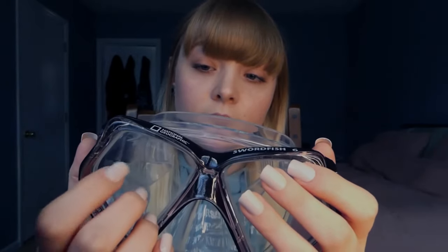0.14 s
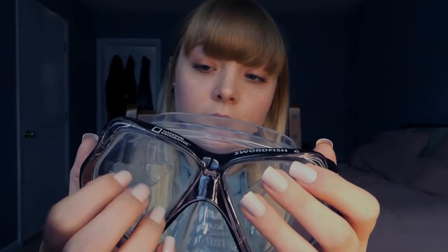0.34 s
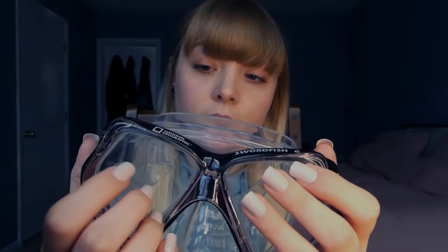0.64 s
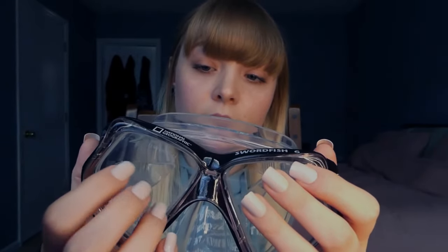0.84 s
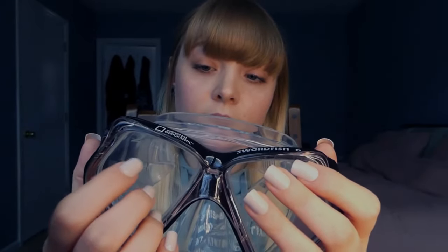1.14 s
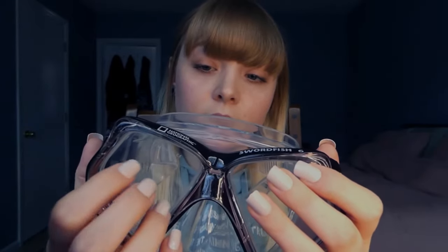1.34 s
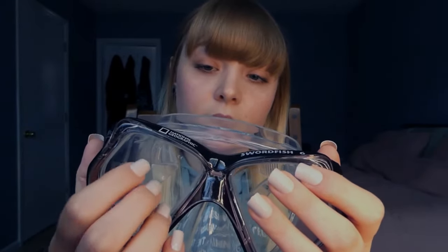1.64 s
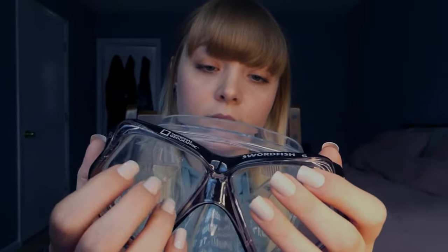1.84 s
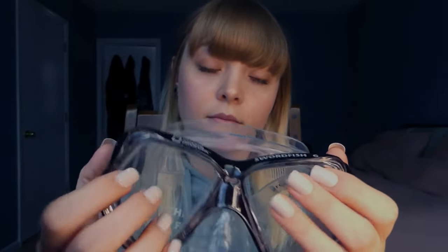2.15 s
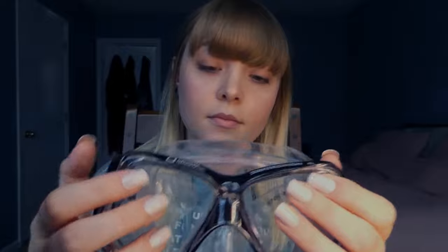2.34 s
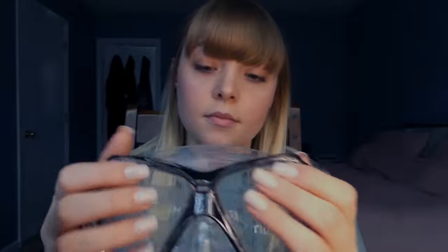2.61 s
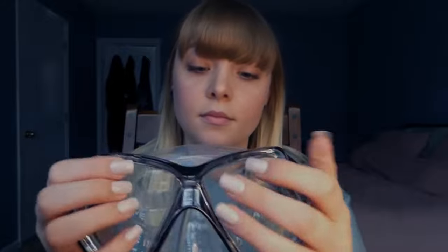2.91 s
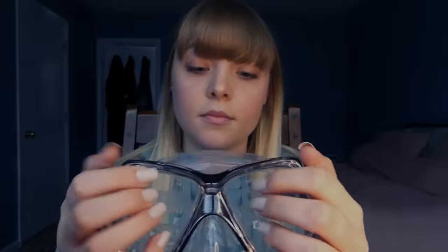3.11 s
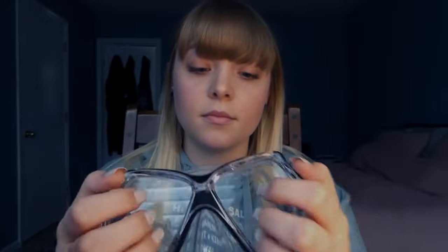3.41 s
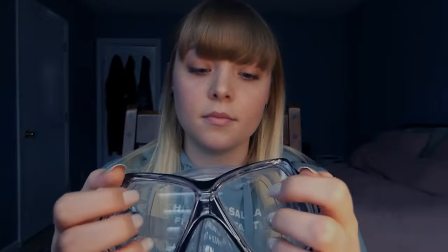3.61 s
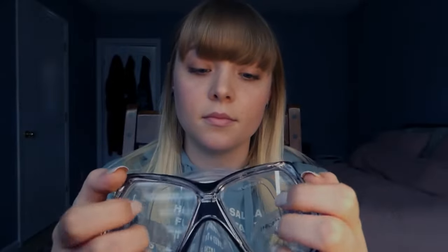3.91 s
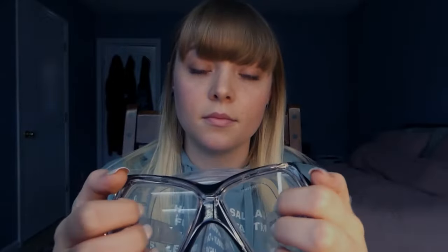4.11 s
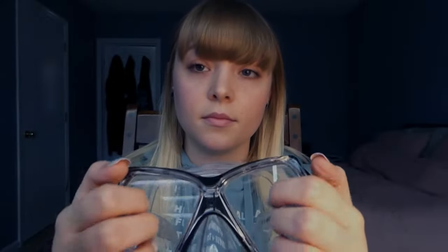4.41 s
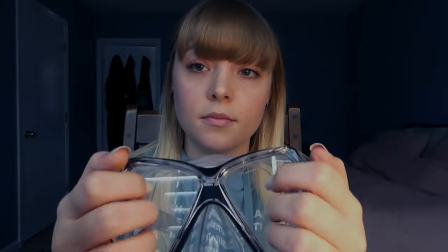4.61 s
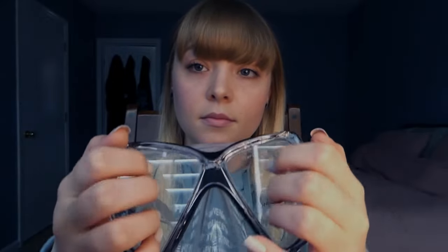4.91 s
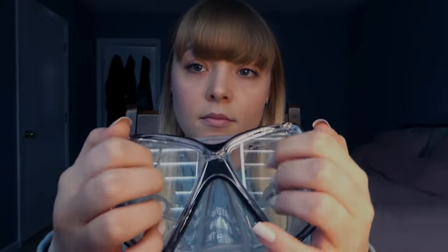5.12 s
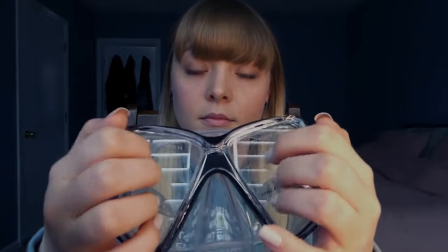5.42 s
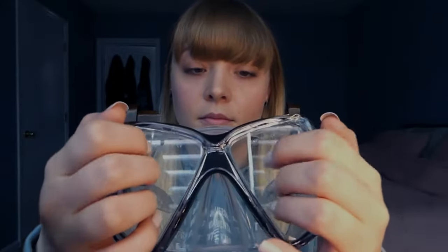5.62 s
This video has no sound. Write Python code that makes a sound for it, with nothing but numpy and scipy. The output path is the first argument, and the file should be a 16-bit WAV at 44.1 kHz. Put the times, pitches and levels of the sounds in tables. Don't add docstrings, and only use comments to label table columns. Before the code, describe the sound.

Rapid fingernail taps on a hard, cupped mask open the scene, dry and clicky, with puffs of air pushed from the cup. A gap follows: faint skin friction, small plastic creaks, a single frame knock, low bumps of air. Tapping returns in tight rolling clusters until the end. Close single-channel microphone, quiet bedroom-like space, hardest taps slightly clipped, low rumble and hiss beneath.

```python
import sys
import numpy as np
from scipy import signal
from scipy.fft import rfft, irfft, next_fast_len
from scipy.io import wavfile
from scipy.ndimage import uniform_filter1d, map_coordinates

SR = 44100
rng = np.random.default_rng(int(sys.argv[2]) if len(sys.argv) > 2 else 0)


def voltage_ratio(decibels):
    exponent = np.asarray(decibels, float) / 20
    return 10 ** exponent


def int16_out(signal):
    q = np.round(np.clip(np.atleast_2d(signal).T, -1, 1) * 32767)
    wavfile.write(sys.argv[1], SR, q.astype(np.int16))


N = 253575

# (time [s], nail ring peak [dB], cup push re ring [dB], hardness re ring [dB])
MIDDLE_TAPS = [
    (0.0191, -9.5, -14.5, -14.5),
    (0.5331, -11, -14, -14),
    (0.9911, -11, -14, -16),
    (1.4593, -12, -14.5, -22),
    (1.8975, -13, -13.5, -19),
    (4.2312, -11, -18.5, -8.5),
    (4.6201, -12, -17, -9),
    (4.942, -11, -19, -11.5),
    (5.2483, -13.5, -18, -13),
    (5.5652, -13, -18, -9.5),
]
OFF_MIDDLE_TAPS = [
    (0.1399, -10, -14.5, -7),
    (0.252, -15.5, -15.5, 2.5),
    (0.627, -8, -16.5, -9),
    (1.09, -5.5, -16.5, -6.5),
    (1.5444, -8, -17, 0.5),
    (1.956, -11, -18.5, -3),
    (3.8393, -14.5, -21, -8),
]
RIM_TAPS = [
    (0.7268, -20.5, -10, 5.4),
    (1.6212, -17, -14.5, 0.67),
]
TOP_EDGE_TAPS = [
    (3.1354, -14.5, -33, 1),
    (3.2466, -20, -45, -7.5),
    (4.4061, -15, -20, 11.5),
    (4.7269, -13.5, -23, 5),
    (5.049, -11, -25, -2),
    (5.363, -7.5, -28.5, -2),
    (5.6533, -10.5, -25.5, -1),
]
FAR_LENS_TAPS = [
    (4.4301, -13.5, -9, -6.5),
    (4.6744, -13, -11, -8),
    (4.758, -14, -10.5, -6.5),
    (5.006, -13, -11.5, -11),
    (5.0975, -14, -10, -4.5),
    (5.3098, -12.5, -11, -10.5),
    (5.4047, -12, -11, -9.5),
    (5.6156, -10.5, -12.5, -12),
]
GLANCING_TAPS = [
    (1.2271, -16.5, -7, -14),
    (4.2834, -16.5, -10.5, -20),
    (4.3417, -11.5, -14, -15.5),
    (4.3494, -16.5, -9, -13),
    (4.6377, -15, -11, -6.5),
    (4.9259, -17, -10, -11),
    (4.9561, -17, -13, -4),
    (5.2718, -11.5, -17, -10.5),
    (5.542, -15.5, -15.5, -18),
    (5.7084, -17, -11.5, -18),
]
# (time of its tap [s], delay [s], level [dB])
BOUNCE = (5.5652, .0022, -3)
# (frequency [Hz], life [s], signed size [1])
SWINGS = [
    (120, 0.0046, 1.77),
    (134, 0.005, 1.67),
    (139, 0.0044, 1.6),
    (90, 0.0067, 0.33),
    (174, .004, 0.62),
    (137, 0.0041, 0.73),
]
# (lens [dB], tip [dB])
SPOT_DB = [
    (-3, -11),
    (0.5, -15.5),
    (7, -10),
    (0, -8),
    (0.7, -11),
    (2, -7),
]
# (frequency [Hz], t60 [s], level at each of the six spots [dB] x 6)
CUP_MODES = [(133, 0.099, -8.5, -21, -10, -31, -11.5, -17),
             (255, 0.093, -17.5, -21, -18, -19, -23.5, -25.5), (432.7, 0.015, 0, -1.5, 2.5, 10.5, 1, -0.5),
             (60, 0.054, -2.5, -21, -1, 6.5, -43, -3), (1222, 0.15, -31, -32, -15, -27, -29, -30)]
LENS_MODES = [(973, 0.0095, -8, -21, -19, -5, 1.5, -6.5), (1284, 0.012, -2, -1, 9.5, 0, -14, -30),
              (1465, 0.012, -25, -6.5, -14, 2.5, 5, 2), (1760, 0.016, 4, -0.5, 6, 5, -9.5, -7.5),
              (1995, 0.0071, -35, -14, -9, -8, 5.5, 2.5)]
NAIL_MODES = [(2647, 0.035, -9.5, -10.5, -6, -9.5, -16, -9.5), (3040, 0.014, 1, -5, -2, -15, -0.5, -9),
              (3475, 0.014, 2, 0, 1, -0.5, -6.5, -6.5), (3712, 0.019, 0.5, -14, 1, -16, -9, -11),
              (4294, 0.012, -6, -4.5, 3.5, -15, -1, -13)]
EDGE_MODES = [(4936, 0.018, 1.5, -8, -0.5, -11.5, -18, -18), (5524, 0.015, 4, -10, -1, -14, 1, -9),
              (6530, 0.0067, -4, 2, 12, 1.5, 3.5, -1), (7170, 0.0061, 2, 0.5, 10.5, 4, 2, -3),
              (7810, 0.0094, -8, -4, -9.5, 0.5, 0, -10), (8420, 0.008, 4, -9, 9, -28, -21, -16)]
TIP_MODES = [(9240, 0.01, 6, -2, 0, 0.5, -6, -9), (9900, 0.013, -7, -3, -32, -6, -7, -12),
             (11160, 0.011, 1, -23, -24, 3, -13, -7), (12130, 0.023, -8, -7, -7, -8, 3, -9),
             (13400, 0.0038, -17, -5, 15, -18, -8, -7)]
# (time [s], peak [dB], brightness [dB])
CREAKS = [(2.167, -37, -5), (2.403, -31.5, -14), (2.61, -24.5, -11), (2.627, -24.5, 4), (2.64, -34, 13),
          (2.696, -30, -6), (2.781, -33, -6), (2.962, -27.5, 6.5), (3.102, -23, -13), (3.113, -15.5, 0),
          (3.125, -11, 1), (3.328, -28, 8), (3.408, -26.5, -16), (3.419, -10.5, -16), (3.436, -31, -12),
          (3.461, -30, -17)]
# (time [s], level [dB])
KNOCK = (2.7468, 1.6)
# (frequency [Hz], t60 [s], level [dB])
KNOCK_MODES = [(975, 0.0046, -5), (1240, 0.0077, 4.5), (1340, 0.072, -25), (2510, 0.0091, -13),
               (3150, 0.0076, -19), (4300, 0.0071, -7), (5300, .01, -16), (6850, 0.0046, -3),
               (8630, 0.0065, -10.5)]
# (time [s], length [s], scrape [dB], pressure [dB])
STROKES = [(2.163, 0.042, -45, -9.5), (2.611, 0.029, -37, 1), (2.687, 0.023, -46, 4),
           (2.739, 0.023, -38.5, 5), (2.772, 0.072, -37, -5.5), (2.839, 0.093, -44.5, 0),
           (2.967, 0.042, -46, 0), (2.99, 0.049, -41.5, -2), (3.027, 0.048, -30.5, -2),
           (3.063, 0.031, -33.5, -5.5), (3.103, 0.039, -24.5, 0.5), (3.133, 0.046, -35, -2),
           (3.177, 0.12, -43.5, -2), (3.252, 0.042, -35, -6.5), (3.269, 0.09, -36, -8),
           (3.314, 0.044, -32.5, -5), (3.35, 0.074, -42, -7), (3.412, 0.038, -42, 0),
           (3.45, 0.079, -50, 0.5), (3.516, 0.054, -46, -3.5)]
# (time [s], rumble [dB])
HOLD = [
    (2.1, -69),
    (2.2, -52),
    (2.4, -49),
    (2.7, -39.5),
    (2.95, -44),
    (3.08, -43),
    (3.27, -44.5),
    (3.4, -39.5),
    (3.75, -56.5),
]
# body, scrape, hiss [dB]
CREEP_DB = [-11.5, -11, -13]
# (frequency [Hz], width [Hz], level [dB])
FRAME_PEAKS = [(1030, 225, 7.75), (1390, 256, 8.8), (1717, 270, 9.3), (2160, 510, 6.1)]
SCRAPE_PEAKS = [(2680, 960, 0.72), (3730, 1080, 4.17), (4950, 1770, 3.4), (6780, 2530, 2.2),
                (8920, 1640, 0.5)]
HISS_PEAKS = [(12400, 12000, 7), (14500, 550, 4)]
PALM_PEAKS = [(182, 114, 8), (496, 680, 1.5)]
# (time [s], signed pressure [1], frequency [Hz])
SHOVES = [(2.181, -0.06, 79), (2.409, -0.038, 90), (2.639, 0.068, 30), (2.772, -0.16, 74.5),
          (2.792, -0.073, 56), (2.895, 0.08, 77.5), (2.981, -0.093, 55), (3.027, -0.046, 45.2),
          (3.107, -0.05, 70), (3.336, 0.073, 79), (3.38, -0.08, 60), (3.398, 0.12, 42.7),
          (3.448, 0.084, 90), (3.47, 0.13, 81.4)]
# (frequency [Hz], level sent back [dB])
SOFT_WALLS = [(150, 12), (1200, -1.5), (3600, -3.5), (7000, -5.5), (10000, -6.5), (15000, -14)]
# (frequency [Hz], t60 [s])
ROOM_T60 = [(150, 0.16), (1200, 0.28), (4000, 0.54), (8000, 0.35), (15000, 0.45)]
# (frequency [Hz], density [dB per Hz])
QUIET = [(12, -30), (20, 5), (77, 2.5), (200, -11), (230, -10.5), (305, -15), (342, -16), (599, -18.5),
         (729, -21), (939, -20.5), (3620, -26.5), (15700, -27), (16100, -65)]

BEND_DB_PER_PUSH_DB, TICK_DB_PER_HARD_DB = 0.44, 0.83
CHOKE_S = 0.0065
UPPER_DB, UPPER_DB_PER_BRIGHT_DB = 3, 0.49
CREAK_RISE_S, CREAK_T60_S = 0.0006, 0.026
HISS_DB, HISS_DB_PER_PRESS_DB = -8.5, -0.6
GRIP_S, LET_GO_S, SAG = 0.018, 0.03, 0.75
PALM_LUMP_DB = 2.5
QUIET_DB = -40


def unit(x):
    return x / np.sqrt(np.mean(x ** 2) + 1e-20)


def along(points, hz):
    point_hz, values = np.transpose(points)
    return np.interp(np.log(hz + 1), np.log(point_hz + 1), values)


def filtered(x, response):
    size = next_fast_len(N + SR // 2)
    spectrum = rfft(x, size) * response(np.fft.rfftfreq(size, 1 / SR))
    return irfft(spectrum, size)[:N]


def resonant(peaks):
    def response(f):
        total = 0
        for k, (hz, width, db) in enumerate(peaks):
            total = total + (-1) ** k * voltage_ratio(db) * 1j * f * width / (hz * hz - f * f + 1j * f * width)
        return total
    return response


def wobble(rate_hz):
    knots = rng.standard_normal(int(N * rate_hz / SR) + 4)
    return map_coordinates(knots, [np.arange(N) * rate_hz / SR])


def add(track, s, sound):
    track[round(s * SR):][:len(sound)] += sound


def ring(modes, spot, t, phase, attack_s):
    hz, t60, *spots_db = np.transpose(modes)[:, :, None]
    detune = 0.012 * rng.standard_normal((len(modes), 1))
    spread_db = 1.5 * rng.standard_normal((len(modes), 1))
    phases = phase - 1.92 * np.arange(len(modes))[:, None]
    waves = np.sin(2 * np.pi * hz * (1 + detune) * t + phases)
    decays = voltage_ratio(spots_db[spot] + spread_db - 60 * t / t60)
    return (decays * waves).sum(0) * (1 - np.exp(-t / attack_s))


def room(sound):
    hz, t, z = signal.stft(rng.standard_normal(SR // 3), SR, nperseg=256)
    z = z * voltage_ratio(along(SOFT_WALLS, hz)[:, None])
    z = z * voltage_ratio(-60 * t / along(ROOM_T60, hz)[:, None])
    tail = signal.istft(z, SR, nperseg=256)[1]
    tail = tail * np.clip((np.arange(len(tail)) / SR - 0.004) / 0.0057, 0, 1)
    return signal.fftconvolve(sound, tail / np.sqrt(SR / 100))


def taps():
    track = np.zeros(N + SR)
    tables = (MIDDLE_TAPS, OFF_MIDDLE_TAPS, RIM_TAPS, TOP_EDGE_TAPS, FAR_LENS_TAPS, GLANCING_TAPS)
    for spot, table in enumerate(tables):
        spot_lens_db, spot_tip_db = SPOT_DB[spot]
        for s, db, push_db, hard_db in table:
            lens_db = spot_lens_db + BEND_DB_PER_PUSH_DB * push_db
            tip_db = spot_tip_db + TICK_DB_PER_HARD_DB * hard_db
            tap(track, spot, s, db, push_db, lens_db, hard_db, tip_db)
    return track[:N]


def tap(track, spot, s, db, push_db, lens_db, edge_db, tip_db):
    t = np.arange(SR // 8) / SR
    push = voltage_ratio(db + push_db + 11.5) * cup_push(spot, t)
    click = voltage_ratio(db) * nail_click(spot, t, lens_db, edge_db, tip_db)
    add(track, s, push + click)
    bounce_s, delay_s, bounce_db = BOUNCE
    if abs(s - bounce_s) < 0.003:
        add(track, s + delay_s, voltage_ratio(bounce_db) * (push + click * voltage_ratio(-60 * t / 0.016)))
    add(track, s, room(voltage_ratio(-14.5 - 60 * t / 0.0052) * click + voltage_ratio(-24) * push))
    add(track, s + 0.0135, voltage_ratio(-26) * push)


def cup_push(spot, t):
    hz, life_s, size = SWINGS[spot]
    swing = size * np.cos(2 * np.pi * hz * t) * np.exp(-(t / life_s) ** 2)
    swing *= np.clip(t / 0.00022, 0, 1) ** 2
    air = sum(ring([mode], spot, t, phase=0.56, attack_s=0.029 * mode[1]) for mode in CUP_MODES)
    return swing + air


def nail_click(spot, t, lens_db, edge_db, tip_db):
    click = voltage_ratio(lens_db - 1.5) * ring(LENS_MODES, spot, t, phase=0.065, attack_s=0.0001)
    click += voltage_ratio(-4) * ring(NAIL_MODES, spot, t, phase=3.2, attack_s=0.0001)
    click += voltage_ratio(edge_db - 2) * ring(EDGE_MODES, spot, t, phase=0.077, attack_s=0.00008)
    click += voltage_ratio(tip_db + 1) * ring(TIP_MODES, spot, t, phase=0.15, attack_s=0.00005)
    click += voltage_ratio(tip_db + 15.5 - 60 * t / 0.0061) * rng.standard_normal(len(t))
    late = t - 0.00025
    click += voltage_ratio(-1) * np.cos(2 * np.pi * late / 0.00021) * np.exp(-(late / 0.00012) ** 2)
    return click * np.exp(-(t / CHOKE_S) ** 2)


def creaks():
    lower, upper, scrape = np.zeros((3, N + SR))
    t = np.arange(SR // 20) / SR
    for s, db, bright_db in CREAKS:
        burst = voltage_ratio(db - 60 * t / CREAK_T60_S) * np.clip(t / CREAK_RISE_S, 0, 1)
        burst = burst * rng.standard_normal(len(t))
        add(lower, s, voltage_ratio(6) * burst)
        add(upper, s, voltage_ratio(UPPER_DB + UPPER_DB_PER_BRIGHT_DB * bright_db) * burst)
        add(scrape, s, voltage_ratio(bright_db - 7) * burst)
    sound = filtered(lower[:N], resonant(FRAME_PEAKS[:2]))
    sound += filtered(upper[:N], resonant(FRAME_PEAKS[2:]))
    sound += filtered(scrape[:N], resonant(SCRAPE_PEAKS))
    return sound


def frame_knock():
    track, t = np.zeros(N), np.arange(SR // 20) / SR
    s, db = KNOCK
    knock = voltage_ratio(db) * ring(KNOCK_MODES, 0, t, phase=3.1, attack_s=0.0013)
    crack = uniform_filter1d(rng.standard_normal(len(t)), size=4)
    knock += voltage_ratio(db - 19 - 60 * t / 0.012) * np.clip(t / 0.0009, 0, 1) * crack
    add(track, s, knock)
    add(track, s, room(voltage_ratio(-21) * knock))
    return track


def rub():
    t = np.arange(N) / SR
    hold = voltage_ratio(np.interp(t, *np.transpose(HOLD), left=-120, right=-120))
    force = hold * voltage_ratio([*CREEP_DB, 0])[:, None]
    for s, length_s, db, press_db in STROKES:
        corners_s = [-GRIP_S / 2, GRIP_S / 2, length_s - LET_GO_S / 4, length_s + LET_GO_S * 3 / 4]
        shape = np.interp(t - s, corners_s, [0, 1, SAG, 0])
        levels = voltage_ratio(db + np.array([press_db, 0, HISS_DB + HISS_DB_PER_PRESS_DB * press_db]))
        force[:3] = np.maximum(force[:3], levels[:, None] * shape)
    force[3] *= voltage_ratio(PALM_LUMP_DB * wobble(14))
    slips = voltage_ratio(3.2 * wobble(800) + 1.3 * wobble(180))
    sound = np.zeros(N)
    for body_force, peaks in zip(force, (FRAME_PEAKS, SCRAPE_PEAKS, HISS_PEAKS, PALM_PEAKS)):
        response = resonant(peaks)
        grains = slips * voltage_ratio(1.5 * wobble(25.42)) * rng.standard_normal(N)
        sound += body_force * unit(filtered(grains, lambda f: response(f) ** 2))
    return sound


def shoves():
    t = np.arange(N) / SR
    sound = np.zeros(N)
    for s, size, hz in SHOVES:
        sound += size * np.cos(2 * np.pi * hz * (t - s)) * np.exp(-(2 * hz * (t - s)) ** 2)
    return sound


def quiet():
    noise = filtered(rng.standard_normal(N), lambda hz: voltage_ratio(along(QUIET, hz)))
    return voltage_ratio(QUIET_DB + 0.11 * wobble(3.1)) * unit(noise)


def scene():
    return (taps() + creaks() + frame_knock() + rub() + shoves() + quiet())[None]


def top_cut(x):
    return signal.sosfilt(signal.butter(12, 17150, fs=SR, output="sos"), x)


def record(dry):
    def microphone(f):
        dip = (5950 ** 2 - f * f + 1j * f * 60) / (5950 ** 2 - f * f + 1j * f * 250)
        low_cut = 1j * f / (12 + 1j * f)
        soft_top = 1 / (1 + 1j * f / 20000)
        return dip * low_cut * soft_top

    x = filtered(dry[0], microphone)
    x = x / (1 + np.abs(x / 0.73) ** 10) ** (1 / 10)
    band_limit = [(15300, -0.5), (16000, -10), (17000, -35), (17200, -90)]  # (Hz, dB)
    x = filtered(x, lambda f: voltage_ratio(along(band_limit, f)))
    return top_cut(x[None])


dry = scene()
out = record(dry)
int16_out(out)
```